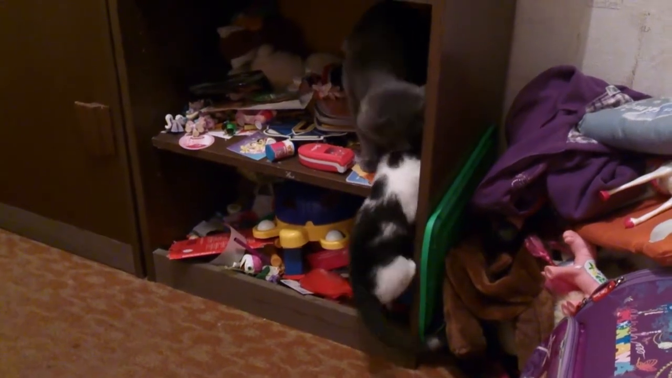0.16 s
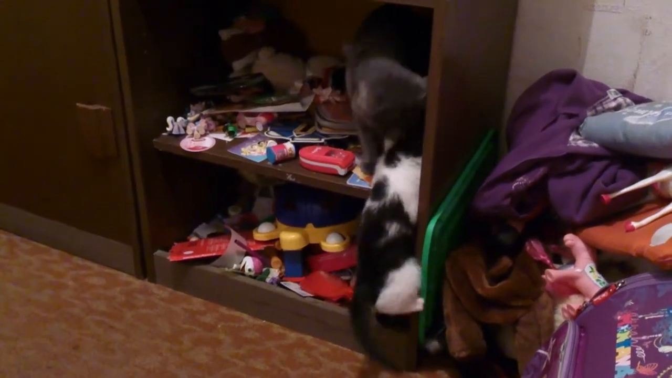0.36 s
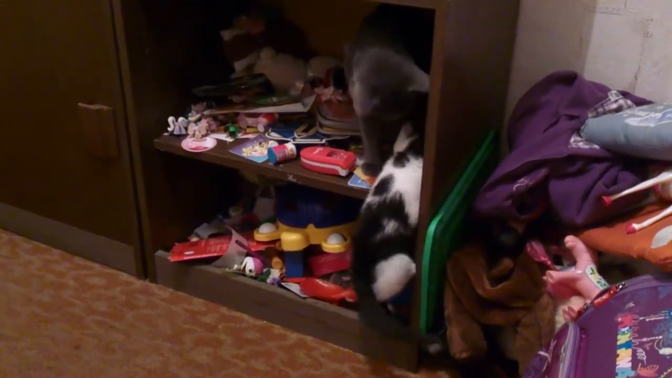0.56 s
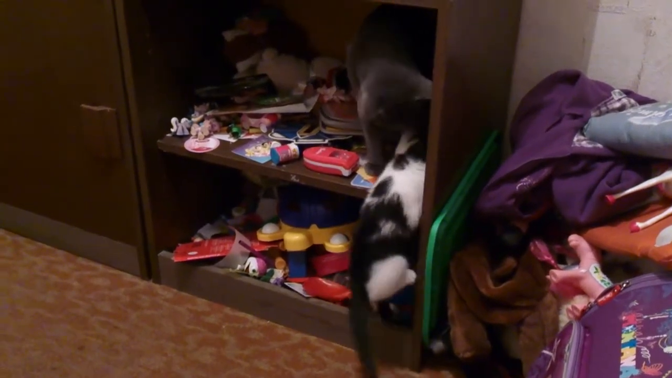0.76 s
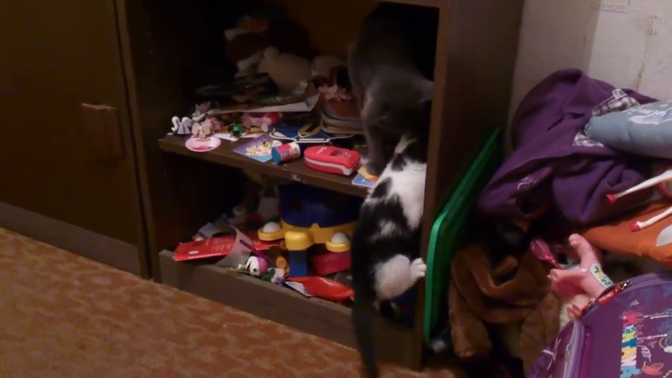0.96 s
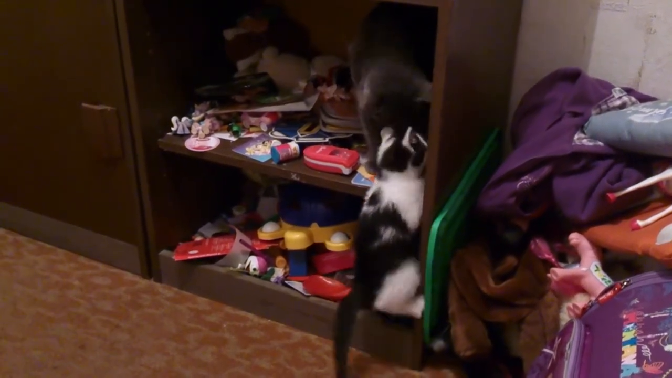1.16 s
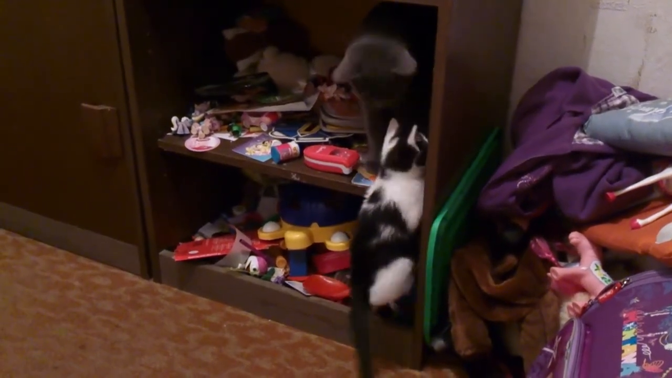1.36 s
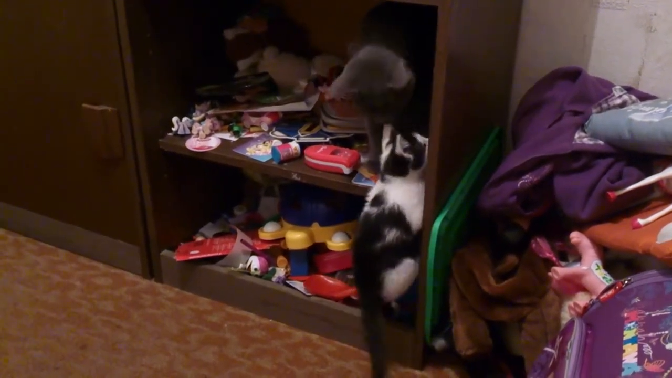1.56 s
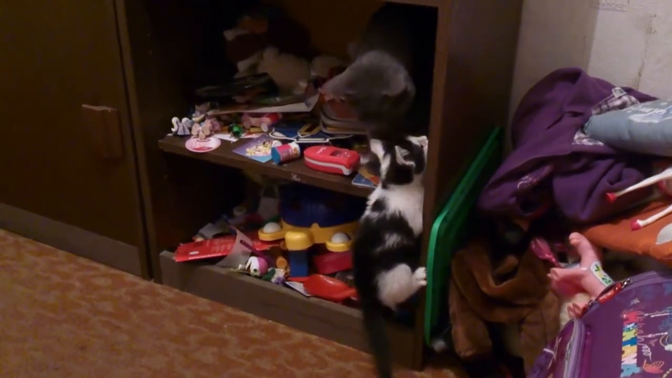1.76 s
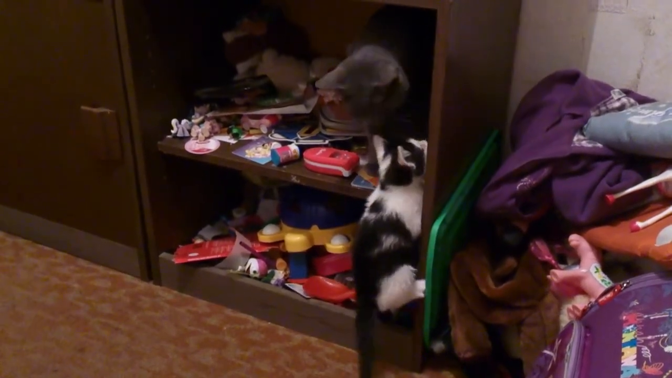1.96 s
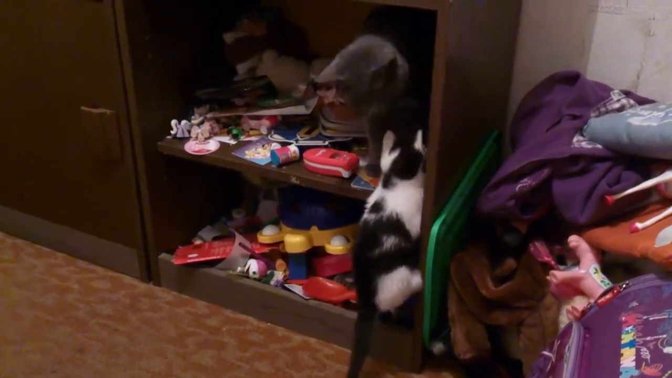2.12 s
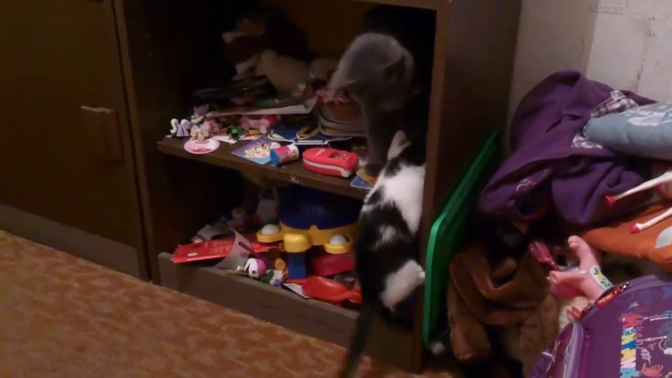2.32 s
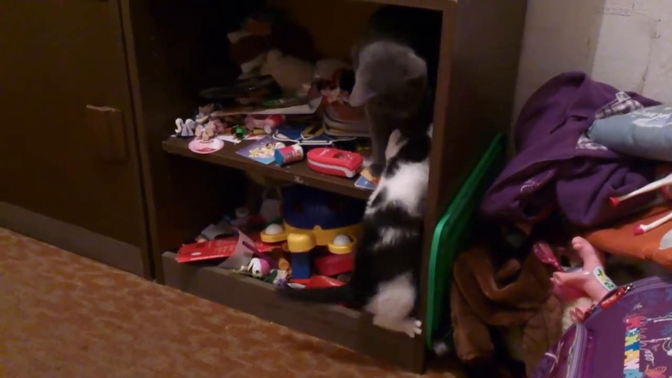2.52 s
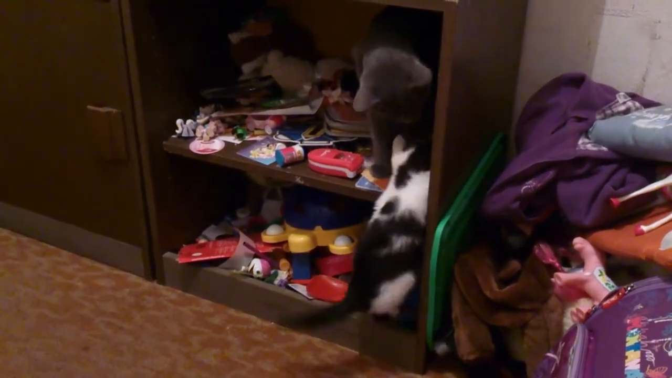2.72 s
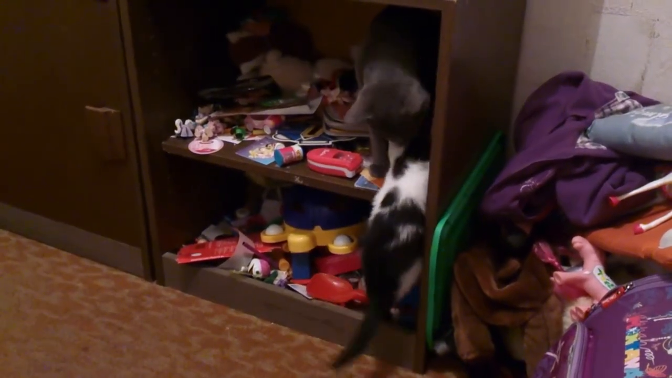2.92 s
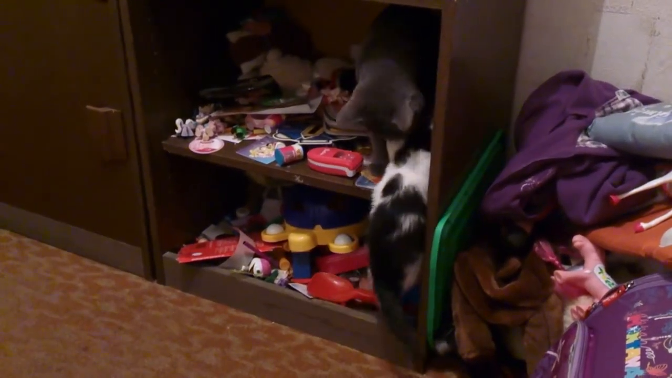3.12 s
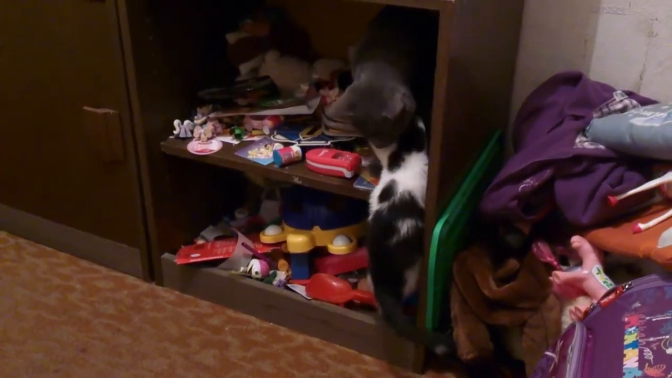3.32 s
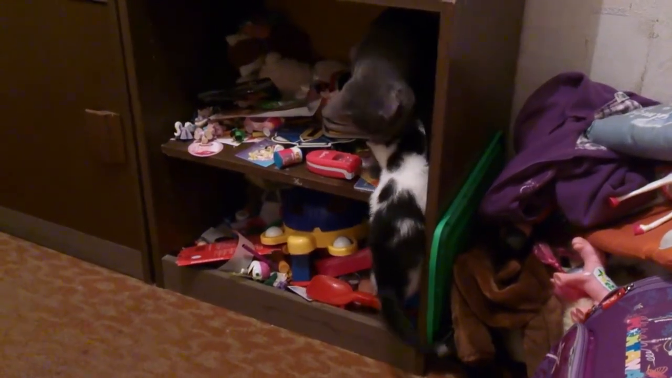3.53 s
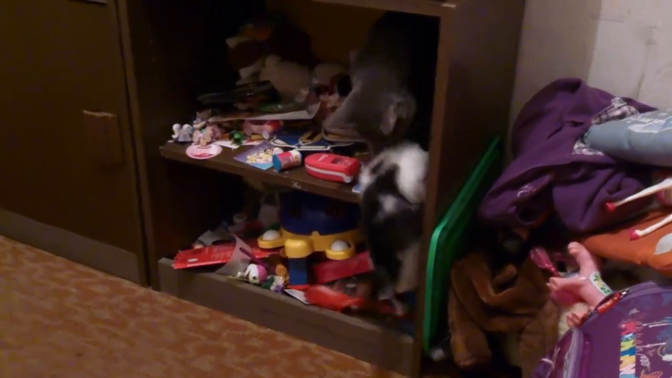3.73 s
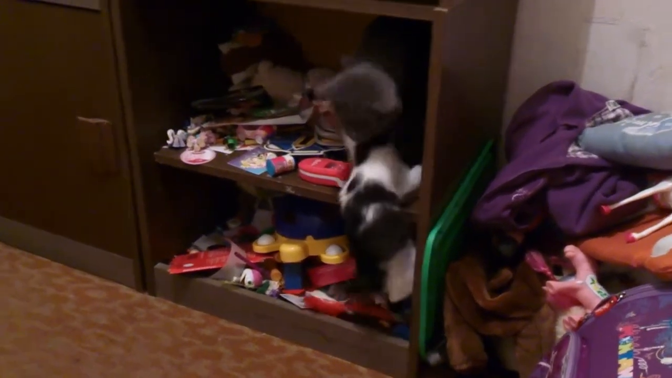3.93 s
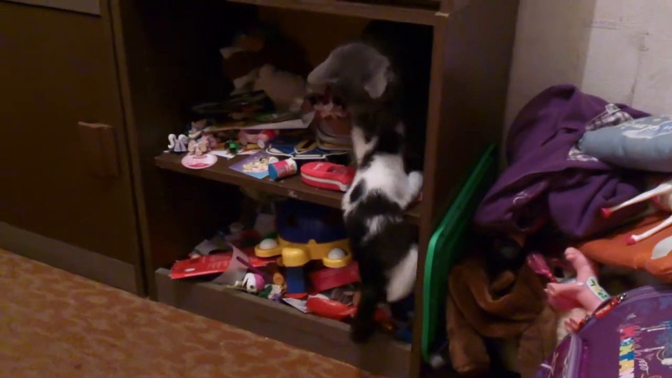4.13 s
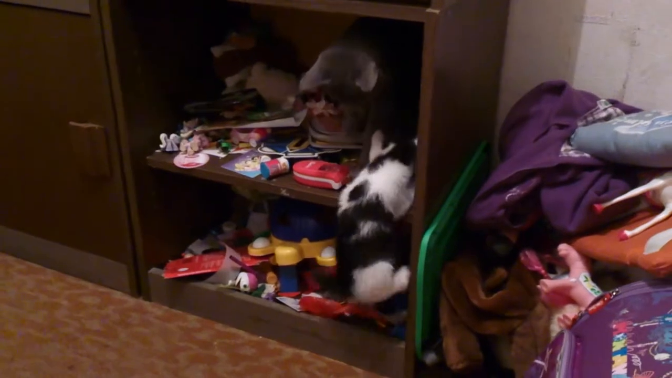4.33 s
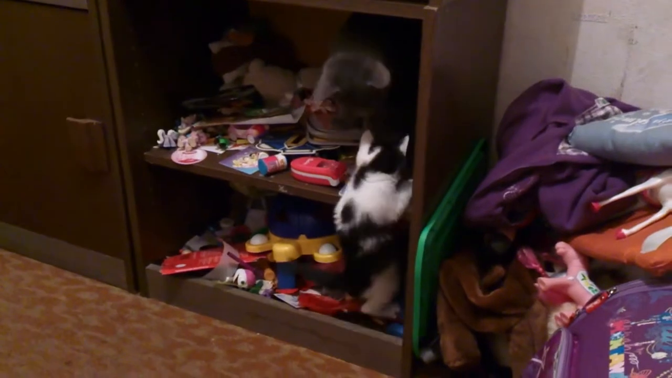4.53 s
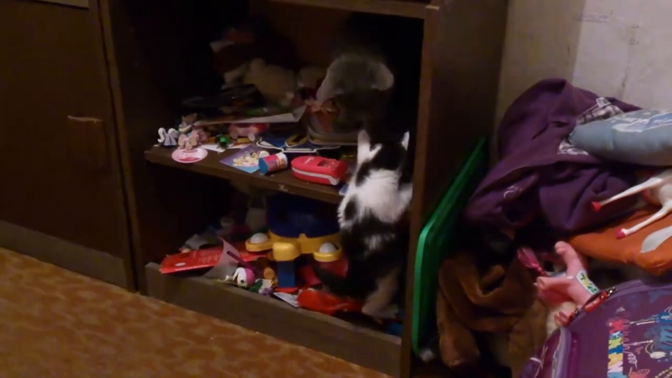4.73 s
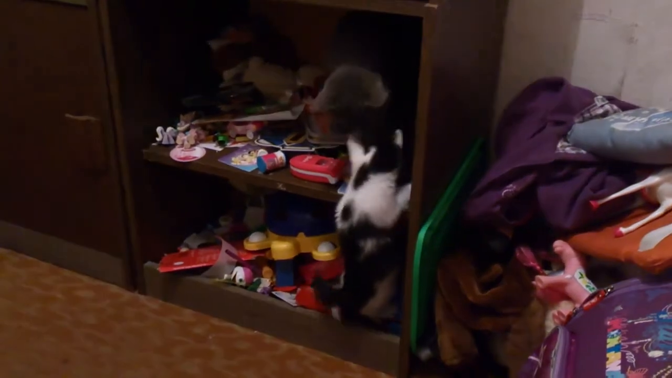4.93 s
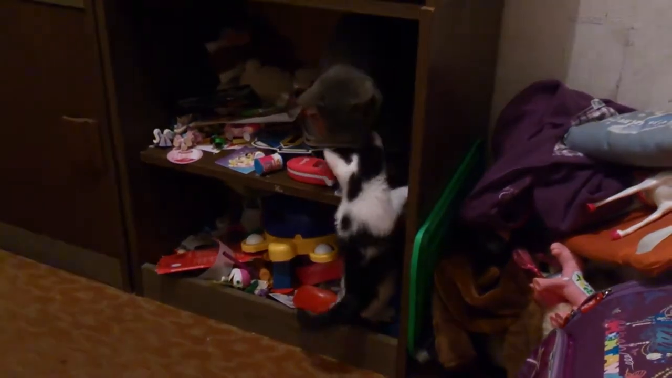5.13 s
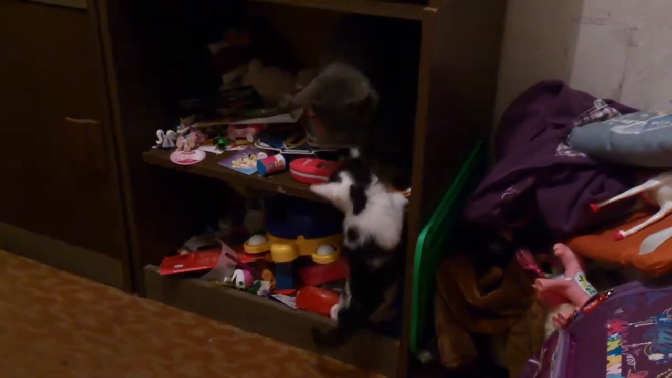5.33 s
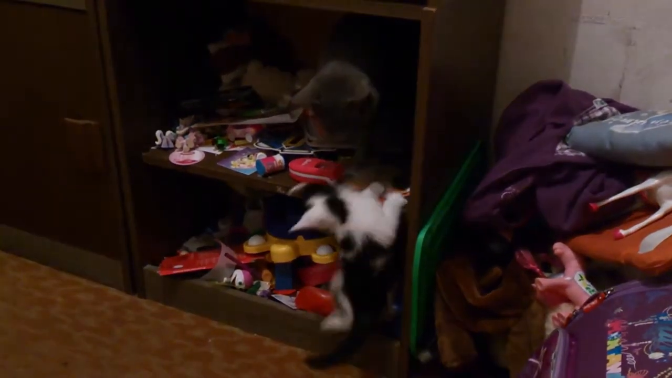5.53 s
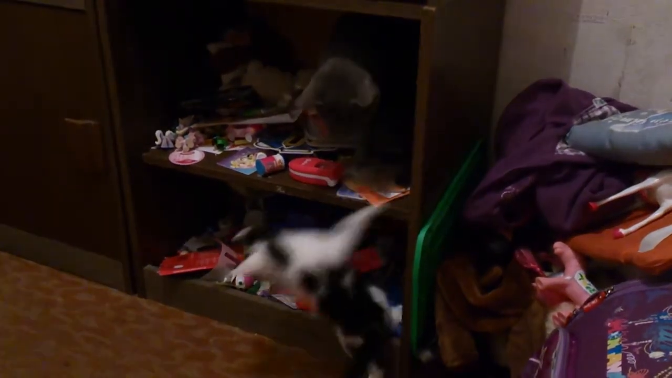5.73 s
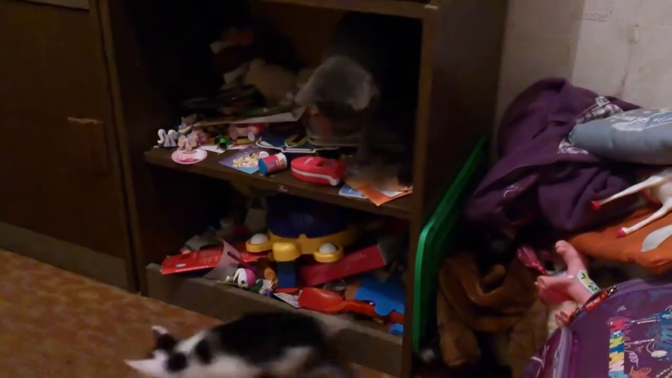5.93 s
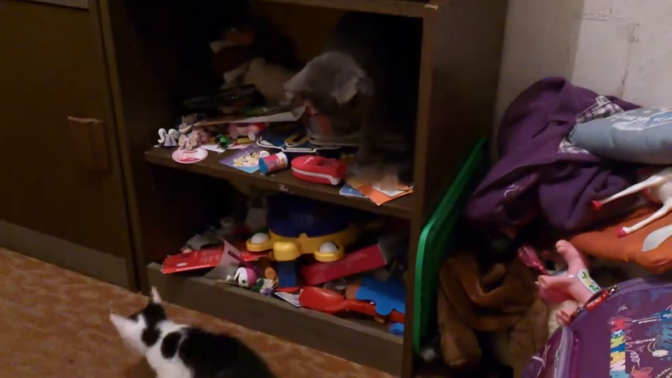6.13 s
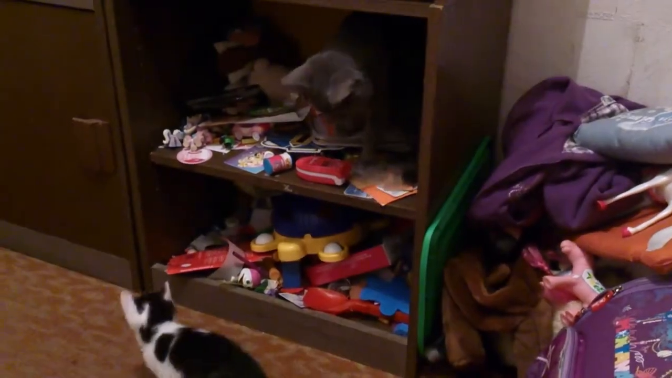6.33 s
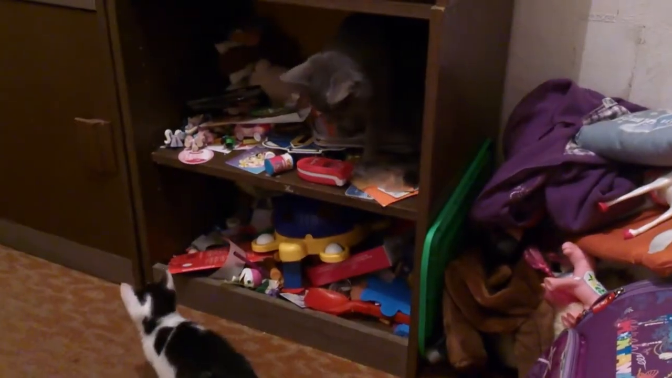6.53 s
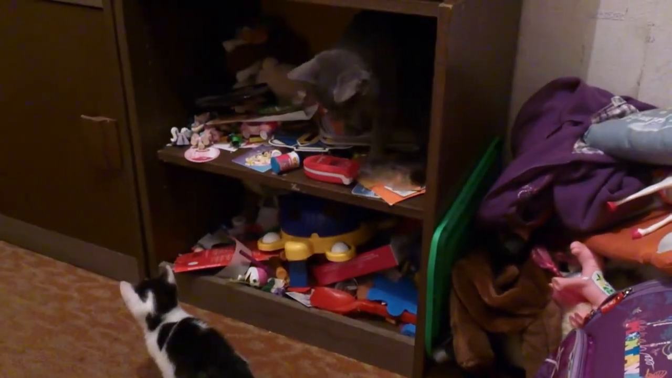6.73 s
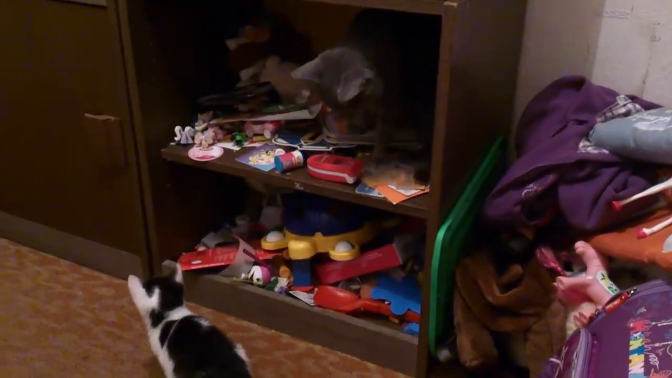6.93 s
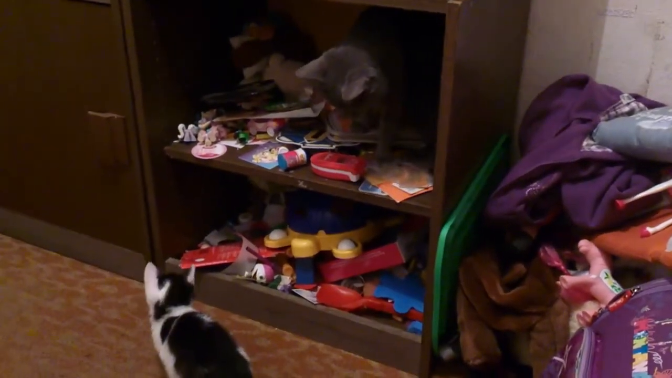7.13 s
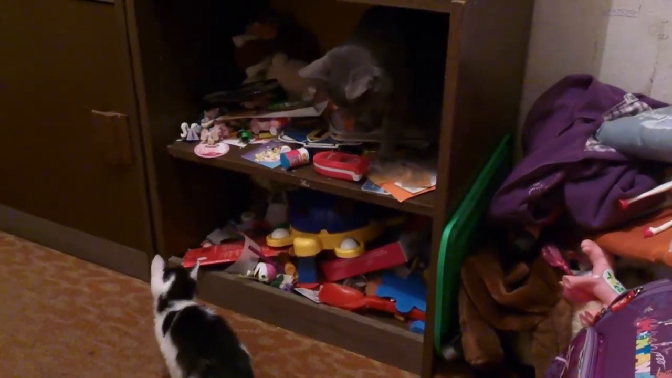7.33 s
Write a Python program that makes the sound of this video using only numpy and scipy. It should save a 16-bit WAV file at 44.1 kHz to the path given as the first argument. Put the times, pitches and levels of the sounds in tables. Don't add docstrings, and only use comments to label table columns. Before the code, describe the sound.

Over a steady noisy background of hiss and rumble, paws shift paper and plastic on wooden shelves. An early scuff and rattle gives way to sparse dry ticks and soft rubbing, a low handling bump, a loud double clack of toys, and finally a cat's landing, several paws almost together on resonant floorboards. Then it is nearly quiet. The small furnished room adds a short, close reverberation.

```python
import sys
import numpy as np
from scipy import signal
from scipy.fft import rfft, irfft
from scipy.io import wavfile
from scipy.ndimage import uniform_filter1d

SR = 44100
rng = np.random.default_rng(int(sys.argv[2]) if len(sys.argv) > 2 else 0)


def boost_factor(decibels):
    exponent = np.asarray(decibels, float) / 20
    return 10 ** exponent


def int16_out(signal):
    q = np.round(np.clip(np.atleast_2d(signal).T, -1, 1) * 32767)
    wavfile.write(sys.argv[1], SR, q.astype(np.int16))


N = 324822
LEFT_LEADS = 20


def evened(x):
    return x / np.sqrt(np.mean(x ** 2) + 1e-20)


def read(points, hz):
    f, value = np.transpose(points)
    return np.interp(np.log(hz + 1), np.log(f + 1), value)


def hiss():
    # pitch in Hz, level in dB per Hz.
    noise_curve = [(10, 4.5), (25, 1), (55, -4), (100, -10), (226, -16), (500, -22), (1000, -27),
                   (2000, -29), (5300, -32), (6200, -37), (8200, -37.5), (9750, -25), (11300, -31.5),
                   (15500, -34)]
    # pitch in Hz, left over right in dB.
    noise_lean = [(60, 3.5), (180, 3), (550, 3), (1650, 0.5), (4970, 0.5), (15000, -2.5)]
    # pitch in Hz, likeness from -1 to 1.
    noise_same = [(60, -0.35), (380, -0.22), (2380, 0.0038), (15000, -0.0031)]
    # pitch in Hz, level in dB.
    whine_lines = [(9717, -80.5), (9776, -103), (9841, -83)]
    frames, hz = N // 512 + 5, np.fft.rfftfreq(2048, 1 / SR)
    a, b, c, d = rng.standard_normal((frames, 1025, 4)).T
    same = np.clip(read(noise_same, hz), -1, 1)[:, None]
    left = a + 1j * b
    right = same * left + np.sqrt(1 - same ** 2) * (c + 1j * d)
    half_lean = read(noise_lean, hz) / 2
    level_db = read(noise_curve, hz) + np.array([half_lean, -half_lean])
    spectrum = np.array([left, right]) * boost_factor(level_db)[:, :, None]
    noise = signal.istft(spectrum, nperseg=2048, noverlap=1536)[1][:, :N]
    noise = boost_factor(-56.5) * evened(noise)
    waver_hz = 4.02 * evened(uniform_filter1d(rng.standard_normal((2, N)), 3000))
    for line_hz, db in whine_lines:
        noise += boost_factor(db + 3) * np.sin(2 * np.pi * np.cumsum(line_hz + waver_hz, 1) / SR)
    return noise


def bumps():
    # start in seconds, level in dB, pitch in Hz.
    jolts = [
        (3.788, -19, 42.6),
        (3.869, -22, 111),
        (5.69, -35, 50),
        (5.745, -28, 70),
    ]
    t, out = np.arange(N) / SR, np.zeros(N)
    for s, db, hz in jolts:
        cycles = np.maximum(t - s, 0) * hz
        out -= boost_factor(db) * cycles ** 2 * np.exp(-2.5 * cycles) * np.sin(2 * np.pi * cycles)
    return out * np.array([[1], [-.3]])


def room_answer():
    # pitch in Hz, time to fall 60 dB in seconds.
    room_decay = [(120, 0.09), (330, 0.28), (870, 0.26), (2300, 0.27), (6000, 0.24), (12000, 0.21)]
    # pitch in Hz, likeness (below zero = opposite polarity).
    room_same = [(60, -0.29), (130, -1.84), (290, -1.28), (640, -1.11), (1410, -0.49), (3100, -0.041),
                 (6820, -0.094), (15000, -0.041)]
    # pitch in Hz, left over right in dB.
    shelf_lean = [(60, -5), (240, -5.5), (950, -6.5), (3770, -7.5), (15000, -3)]
    size, reflections_db = SR // 2, 8
    taps = rng.standard_normal((2, size)) * (rng.random((2, size)) < .15)
    hz, t, z = signal.stft(taps, SR, nperseg=128)
    fade = boost_factor(-60 * t / read(room_decay, hz)[:, None])
    tail = signal.istft(z * fade, SR, nperseg=128)[1][:, :size]
    tail *= np.clip((np.arange(size) - 90) / 150, 0, 1)
    tail *= boost_factor(reflections_db) / np.linalg.norm(tail, axis=1, keepdims=True)
    tail[0, 64 - LEFT_LEADS] = -1
    tail[1, 64] = 1
    hz = np.fft.rfftfreq(size, 1 / SR)
    same = np.clip(read(room_same, hz), -.99, .99)
    own, right = rfft(tail)
    mixed = same * right + np.sqrt(1 - same ** 2) * own
    left = irfft(mixed * boost_factor(read(shelf_lean, hz)), size)
    left[size * 4 // 5:] = 0
    return np.array([left, tail[1]]) / np.linalg.norm(tail[1])


def room(x, count=3):
    turn = np.pi * 7.0 * np.arange(N) / SR
    out = np.zeros((2, N))
    for k in range(count):
        share = np.sqrt(2 / count) * abs(np.cos(turn + np.pi * k / count))
        out += signal.fftconvolve((x * share)[None], room_answer(), axes=1)[:, 64:N + 64]
    return out


def ring(modes):
    t, out = np.arange(4096) / SR, np.zeros(4096)
    for k, (hz, width, db) in enumerate(modes):
        tone = np.exp(-np.pi * width * t) * np.sin(2 * np.pi * hz * t)
        out += (-1) ** k * boost_factor(db) * np.sqrt(width) * tone
    return out / np.linalg.norm(out)


def favour(x, hz, width, share):
    turn = np.exp(2j * np.pi * np.cumsum(hz) / SR)
    r = np.exp(-np.pi * width / SR)
    smooth = signal.lfilter([(1 - r) ** 2], [1, -2 * r, r ** 2], x / turn)
    return share * x + 1.83 * (turn * smooth).real


def bodies(force):
    # pitch in Hz, width in Hz (wider dies faster), level in dB.
    plastic_modes = [(2200, 770, -4.5), (2814, 314, -3), (2997, 415, -3.5), (3616, 1030, -2.5),
                     (4256, 787, 0), (4685, 790, -2), (5780, 450, 1), (5762, 396, 0)]
    board_modes = [(539, 39, 0), (662, 98, 0.5), (800, 71, 1.5), (900, 146, 2), (1040, 160, 2.5),
                   (1310, 190, -2), (1482, 57, 0.5), (1748, 240, 3)]
    paper_modes = [(6630, 1300, -4), (7780, 700, -4.5), (8770, 1260, 0), (10300, 1640, 2),
                   (11120, 1140, 0.5), (13670, 2300, -13)]
    cabinet_modes = [(128, 63, -3.5), (193, 50, -3), (289, 55, -1), (438, 130, -6)]
    # start in seconds,
    # plastic pitch in Hz, board pitch in Hz, share of sound kept outside that band (0 to 1).
    touched = [(0, 3500, 1490, 0.56), (.56, 2800, 1090, 0.63), (.84, 3000, 1270, 0.2),
               (1.08, 3400, 940, 0.22), (1.19, 4050, 990, 0.12), (1.7, 3200, 1500, .3),
               (1.83, 3240, 1660, 0.9), (1.93, 3500, 990, 0.48), (2.27, 2800, 1480, 0.5),
               (2.39, 3460, 1130, 0.54), (2.6, 3750, 1500, 1), (2.85, 4100, 1400, 0.26),
               (3.3, 2400, 1140, 0.3), (3.53, 3240, 1300, 0.98), (3.7, 2400, 1040, 0.1),
               (3.845, 3400, 1040, 0.75), (3.9, 3150, 855, 0.4), (4.059, 2800, 1290, 0.93),
               (4.2, 2200, 1670, 1), (4.27, 2200, 2040, 0), (4.42, 2600, 1590, 0.53),
               (4.52, 3400, 900, 0.76), (4.94, 3660, 1500, 0.9), (5.02, 2400, 1510, 0.57),
               (5.2, 4500, 1500, 0.4), (5.33, 2520, 1500, 0.15), (5.7, 4180, 1390, 0),
               (5.729, 2740, 900, 0.6), (5.96, 2500, 740, 0.26)]
    modes = (plastic_modes, board_modes, paper_modes, cabinet_modes)
    plastic, board, paper, cabinet = (signal.oaconvolve(push, ring(body))[:N]
                                      for push, body in zip(force, modes))
    s, *columns = np.transpose(touched)
    now = np.clip(np.searchsorted(s, np.arange(N) / SR) - 1, 0, None)
    plastic_hz, board_hz, share = (column[now] for column in columns)
    plastic = favour(plastic, plastic_hz, 3500, share)
    board = favour(board, board_hz, 1450, share)
    return plastic + board + paper + cabinet


def slips():
    slips_per_s, spread_db = 5400, 1
    size = boost_factor(spread_db * np.minimum(rng.exponential(1, N), 4)) * rng.choice([-1., 1.], N)
    bunching = boost_factor(2.0 * evened(uniform_filter1d(rng.standard_normal(N), 200)))
    return evened(size * bunching * (rng.random(N) < slips_per_s / SR))


def pressed(size):
    press_share, lift_share = .35, 0.24
    u = np.arange(size) / size
    hold = np.minimum(u / press_share, (1 - u) / lift_share)
    return np.sin(np.pi / 2 * np.clip(hold, 0, 1)) ** 2


def scrapes():
    # start in seconds, length in seconds, level in dB, first pitch in Hz, last pitch in Hz.
    toy_glides = [(.60, 0.11, -40.5, 1260, 1110), (5.03, 0.074, -68, 1800, 1600),
                  (.83, 0.05, -66.5, 1410, 1400), (0.958, 0.16, -68, 1430, 1400),
                  (1.104, .21, -57, 705, 1170), (2.402, 0.092, -52, 950, 1380),
                  (3.79, .12, -49, 2280, 1900), (3.926, 0.096, -54, 2000, 2010),
                  (4.538, 0.055, -38.5, 1600, 1520), (4.26, .18, -61.5, 1730, 2230),
                  (5.972, 0.066, -56, 950, 800)]
    out, grains = np.zeros(N), slips()
    for s, length, db, from_hz, to_hz in toy_glides:
        at = np.arange(round(s * SR), round((s + length) * SR))
        band = favour(grains[at], np.linspace(from_hz, to_hz, len(at)), width=430, share=0)
        out[at] += boost_factor(db) * pressed(len(at)) * evened(band)
    return out


def drags():
    # start in seconds, length in seconds,
    # plastic level in dB, board level in dB, paper level in dB.
    paw_slides = [(.338, 0.066, -67.5, -70.5, -64), (.40, 0.063, -61.5, -63.5, -61.5),
                  (.562, .06, -61, -65, -60), (.592, 0.079, -39, -40.5, -45),
                  (1.072, 0.11, -53.5, -58, -61), (1.18, 0.044, -50, -60.5, -60),
                  (1.245, 0.035, -52.5, -58, -62), (1.91, 0.21, -64.5, -64, -72.5),
                  (2.43, 0.11, -55.5, -63, -63.5), (2.858, 0.037, -59.5, -65, -70),
                  (3.34, 0.098, -71.5, -70, -76), (2.915, 0.042, -61, -65, -59),
                  (3.60, 0.18, -66.5, -67, -72), (3.72, 0.18, -56.5, -56.5, -61.5),
                  (3.885, .085, -58, -53.5, -65), (3.965, 0.04, -59.5, -54.5, -69),
                  (4.03, 0.11, -66, -66, -62.5), (4.195, 0.076, -70, -67, -75),
                  (4.25, 0.16, -67.5, -61.5, -76), (4.41, 0.07, -62, -59.5, -65),
                  (4.68, 0.066, -66, -63.5, -68.5), (5.0, 0.095, -69.5, -68.5, -74),
                  (5.615, 0.074, -69.5, -76, -75), (5.71, 0.037, -51.5, -51.5, -56)]
    scuffs = [(.234, 0.035, -65.5, -68, -65), (.842, 0.033, -72, -73, -88), (.972, .05, -88, -73, -88),
              (2.285, 0.13, -70, -73.5, -75), (2.402, 0.096, -57, -55.5, -64.5),
              (2.62, 0.043, -63.5, -82, -65), (3.546, 0.084, -61.5, -67, -64),
              (4.95, 0.031, -61.5, -77, -65), (5.205, 0.042, -72, -85, -82), (5.342, .05, -82, -68, -84),
              (5.9, 0.043, -66, -57, -66.5), (1.90, 0.084, -70, -82, -59), (1.265, 0.046, -68, -58, -75)]
    force_db, cabinet_below_board_db = 6.5, -6
    scuff_rise_s, scuff_fade_db = 0.0038, -16
    force = np.zeros((4, N))
    for rows, sudden in ((paw_slides, False), (scuffs, True)):
        for s, length, plastic_db, board_db, paper_db in rows:
            t = np.arange(0, length, 1 / SR)
            if sudden:
                shape = np.minimum(t / scuff_rise_s, 1) * boost_factor(scuff_fade_db * t / length)
            else:
                shape = pressed(len(t))
            levels = np.array([plastic_db, board_db, paper_db, board_db + cabinet_below_board_db])
            force[:, round(s * SR):][:, :len(t)] += boost_factor(levels + force_db)[:, None] * shape
    return force * slips()


def clatter(t60, first):
    t = np.arange(4000) / SR
    size, chance = rng.standard_normal((2, len(t)))
    rebounds = size * (chance > .8) * boost_factor(-60 * t / t60)
    out = 0.44 * rebounds * np.minimum(t / 0.0021, 1)
    out[0] = first
    return out


def blows(rows, first):
    body_db = [12.06, 14.66, 15.15, 25.8]
    cabinet_below_board_db = -13.5
    force = np.zeros((4, N + 4000))
    for s, plastic_db, board_db, paper_db, t60 in rows:
        start = round(s * SR)
        levels = [plastic_db, board_db, paper_db, board_db + cabinet_below_board_db]
        force[:, start:start + 4000] += boost_factor(np.add(levels, body_db))[:, None] * clatter(t60, first)
    return force[:, :N]


def ticks():
    # start in seconds, plastic level in dB, paper level in dB.
    claw_ticks = [(.072, -54, -53), (0.238, -62, -52), (1.140, -45, -42), (1.397, -48.5, -59),
                  (1.728, -49.5, -56), (2.6195, -48, -51), (2.9117, -35, -39.5), (2.941, -28.5, -44),
                  (3.610, -41.5, -45), (3.67, -56, -56), (3.695, -48, -39.5), (3.707, -60, -49),
                  (3.911, -40, -44), (4.072, -46.5, -54), (4.103, -47, -47.5), (4.186, -52, -49),
                  (4.222, -58, -62), (4.408, -42, -53), (4.954, -61, -62), (5.398, -59.5, -56),
                  (5.434, -57, -49.5), (5.7092, -41, -29), (5.719, -41, -37), (6.150, -58, -60)]
    board_below_plastic_db, t60_s = -25, .004
    rows = [(s, plastic_db, plastic_db + board_below_plastic_db, paper_db, t60_s)
            for s, plastic_db, paper_db in claw_ticks]
    return bodies(blows(rows, first=.7))


def knocks():
    # start in seconds, plastic level in dB, board level in dB, paper level in dB,
    # time for the rattle to fall 60 dB in seconds.
    toy_knocks = [(.610, -33, -35, -30, 0.015), (.629, -26, -34, -20, 0.015), (.647, -30, -52, -40, 0.024),
                  (.661, -40, -23.5, -49, 0.0055), (1.837, -48, -49, -42, 0.035),
                  (1.8484, -18.5, -29, -31, 0.007), (1.862, -36, -34.5, -36, 0.0092),
                  (2.403, -42, -34.5, -55, 0.011), (2.921, -35, -53, -40, 0.027),
                  (2.950, -25.5, -69, -39, 0.019), (3.8492, -31, -31, -41.5, 0.047),
                  (3.8735, -29, -21.5, -34, 0.017), (3.9754, -46, -36.5, -63, 0.039),
                  (4.529, -28.5, -38, -35.5, 0.08), (4.541, -41, -30.5, -19.5, 0.032),
                  (4.5435, -14.5, -19, -18.5, 0.041), (4.558, -13.5, -23.5, -16.5, 0.019),
                  (5.344, -36.5, -60, -70, 0.011), (5.7474, -19.5, -15.5, -33.5, 0.035)]
    return blows(toy_knocks, first=0.62)


def landing():
    # start in seconds, level in dB, time for the rattle to fall 60 dB in seconds.
    paw_falls = [
        (5.7478, -7.5, 0.014),
        (5.7554, -9.5, 0.023),
        (5.765, -9.5, 0.02),
        (5.7871, -19, 0.023),
        (5.980, -44, 0.1),
        (6.005, -46, 0.019),
    ]
    # pitch in Hz, width in Hz, level in dB.
    floor_modes = [(123, 42, -15.5), (202.2, 15, -2.5), (321, 23, -3.5), (410, 78, -9), (520, 41, -2),
                   (645, 72, -2.5), (785, 37, -3), (1050, 76, -3), (1320, 110, -5.5), (1396, 135, -2.5),
                   (1780, 480, -3), (2800, 340, -11), (3400, 360, -24), (4000, 520, -26)]
    force = np.zeros(N + 4000)
    for s, db, t60 in paw_falls:
        start = round(s * SR)
        force[start:start + 4000] += boost_factor(db + 9) * clatter(t60, 0.82)
    return signal.oaconvolve(force, ring(floor_modes))[:N]


def scene():
    tick, floor = ticks(), landing()
    near = boost_factor(-2) * tick + boost_factor(-6) * floor
    straight = np.array([-.55 * np.roll(near, -LEFT_LEADS), near])
    shelves = bodies(drags() + knocks()) + scrapes()
    return room(shelves + 1.12 * tick + 1.13 * floor) + straight + bumps() + hiss()


def low_pass(x):
    return signal.sosfilt(signal.butter(12, 16340, fs=SR, output="sos"), x)


def record(dry):
    edge = signal.firwin(511, 15700, window=("kaiser", 9), fs=SR)
    mix = signal.oaconvolve(dry, edge[None], "same")
    return low_pass(mix)


dry = scene()
out = record(dry)
int16_out(out)
```